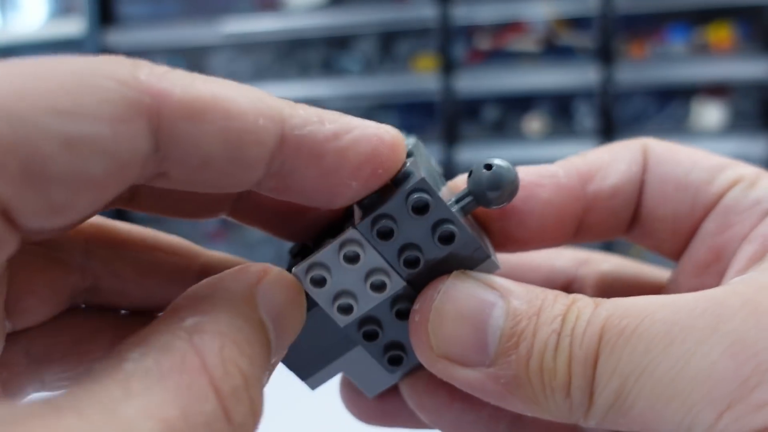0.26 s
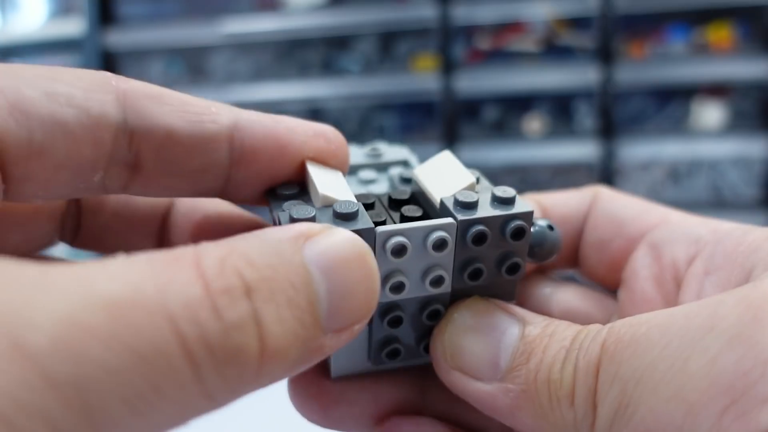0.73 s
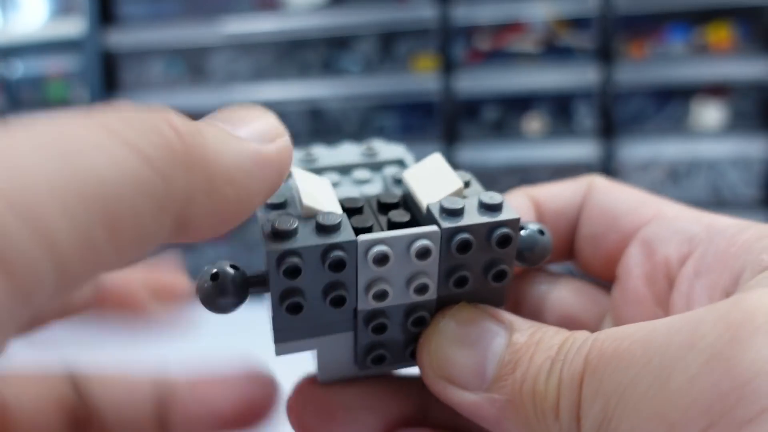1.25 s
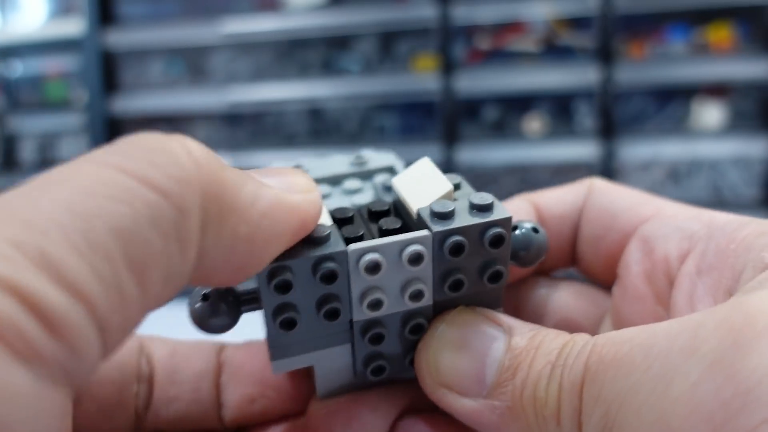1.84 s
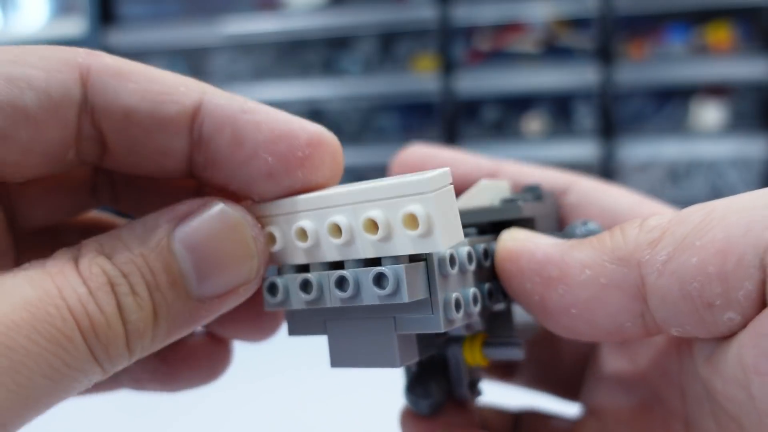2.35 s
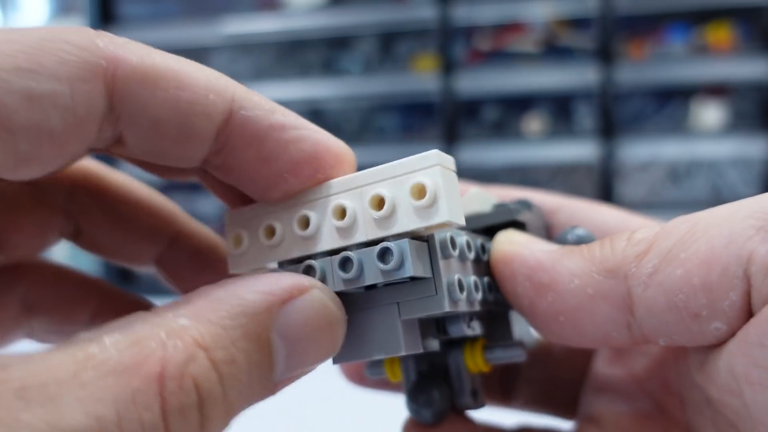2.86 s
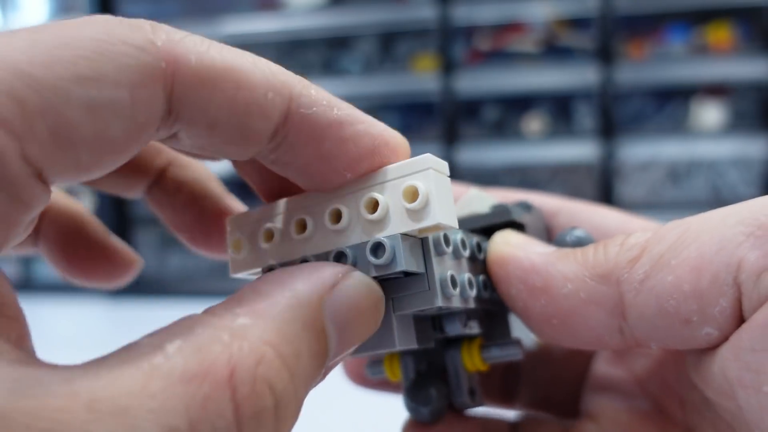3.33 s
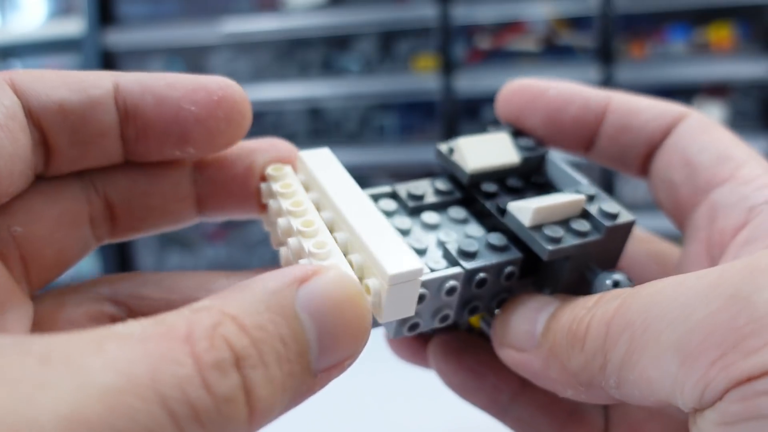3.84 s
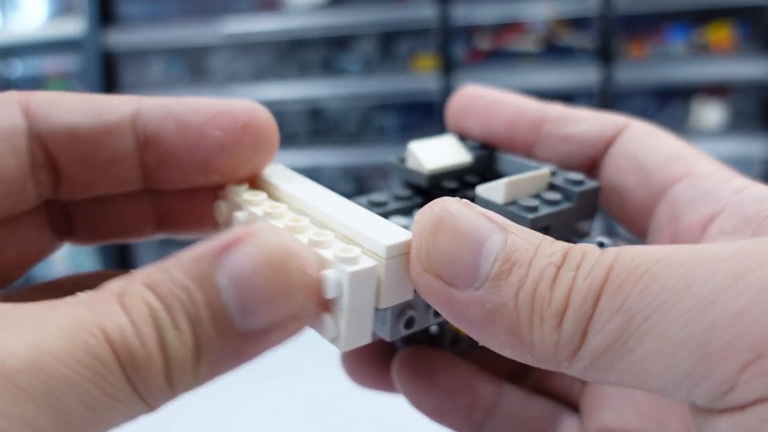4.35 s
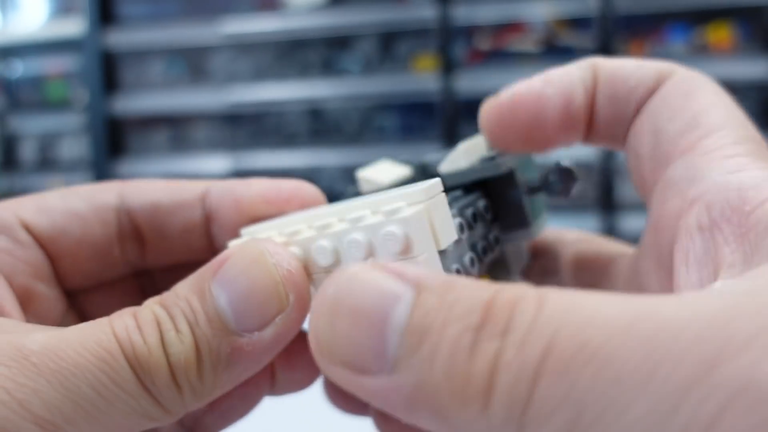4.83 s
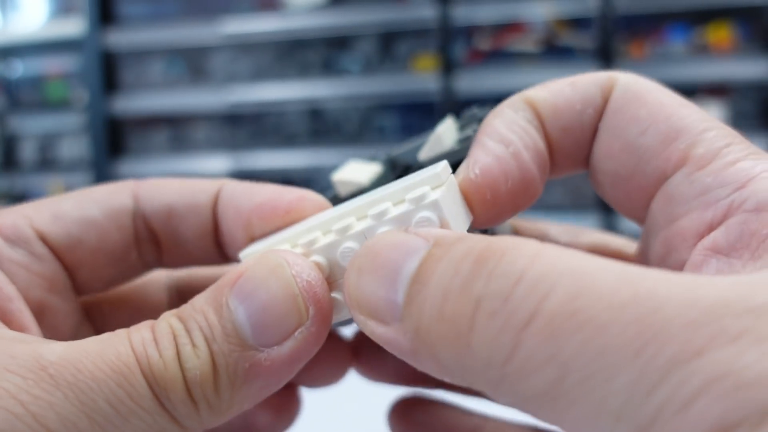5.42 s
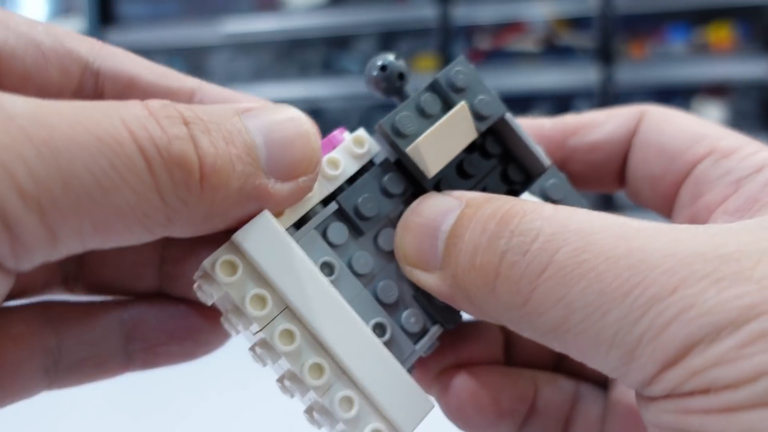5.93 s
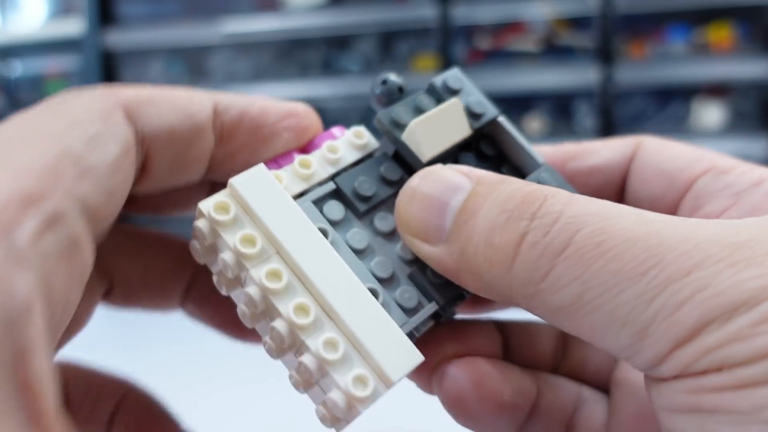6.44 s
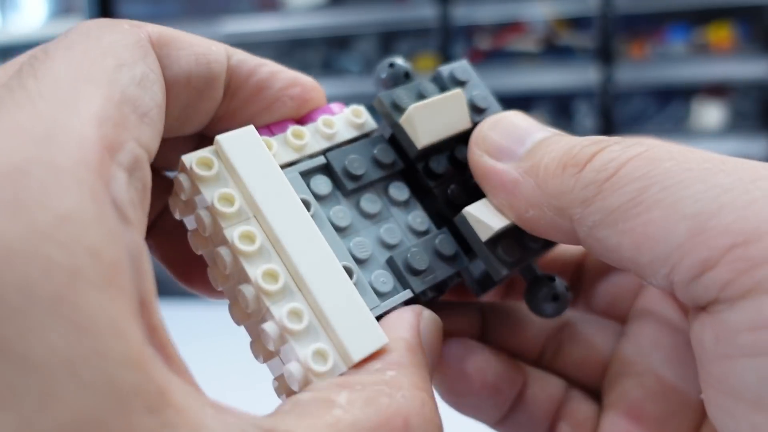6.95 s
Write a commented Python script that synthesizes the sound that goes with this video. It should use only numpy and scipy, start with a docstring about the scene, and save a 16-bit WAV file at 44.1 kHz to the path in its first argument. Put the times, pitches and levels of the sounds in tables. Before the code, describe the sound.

Crisp, dry plastic snaps and tiny creaks as fingers press toy bricks onto a model, with soft sliding rustles and quiet room hush between.

```python
"""Snapping plastic bricks

Two hands press small hollow bricks onto a model, heard close up and in stereo in a small room.
Each snap is a short force that excites the damped modes of the bricks, after a soft gritty onset;
the few onsets of several milliseconds are heard as creaks. Fingers slide as runs of tiny friction grains.
Early reflections and a diffuse tail surround them, above shaped noise for the room hush and a sine hum."""
import sys
import numpy as np
from scipy import signal
from scipy.fft import rfft, irfft
from scipy.io import wavfile

SR = 44100
rng = np.random.default_rng(int(sys.argv[2]) if len(sys.argv) > 2 else 0)


def transcribe(signal):
    """Save signal, clipped to [-1, 1], as a 16-bit WAV file at the path in sys.argv[1]."""
    frames = np.atleast_2d(signal).T
    limited = np.clip(frames, -1, 1)
    pcm = np.round(limited * 32767).astype(np.int16)
    wavfile.write(sys.argv[1], SR, pcm)


N = 316638
CUTOFF_HZ = 16000   # upper edge of the bricks and of the whole sound


def from_db(db):
    """Amplitude ratio of a level: 20 dB is a factor of ten."""
    return 10 ** (np.asarray(db) / 20)


def unit_energy(x):
    """Energy normalisation: the squares sum to one."""
    return x / np.sqrt(np.sum(x ** 2) + 1e-20)


def at_hz(points, hz, axis=1):
    """Interpolate a column of a table linearly along log frequency."""
    points = np.array(points)
    return np.interp(np.log(np.maximum(hz, 1)), np.log(points[:, 0]), points[:, axis])


def add(track, start_s, sound):
    """Superposition: sounds add sample by sample from the start time."""
    i = int(np.clip(round(start_s * SR), 0, N - 1))
    track[i:i + len(sound)] += sound[:N - i]


def stereo(mid, side):
    """Sum and difference: left is mid plus side, right is mid minus side."""
    return np.array([mid + side, mid - side])


def hush():
    """Stationary noise: random spectra shaped by level curves, plus a sine for the low hum of a distant fan."""
    # air noise of the room: (frequency [Hz], relative spectral density [dB])
    hush_spectrum = [(15, -44), (25, -23.5), (80, -18.5), (141, -12.5), (309, -1), (516, -3.5), (591, -2.5),
                     (1260, -4), (1520, -5.5), (2990, -11), (3340, -12), (4370, -14), (6560, -17),
                     (13600, -21), (16000, -22.5)]
    # its width: (frequency [Hz], side level relative to mid [dB])
    hush_width = [(60, -2.5), (130, -10), (290, -11), (640, -4.5), (1410, -2.5), (15000, -1)]
    hush_db = -65   # rms of the mid signal
    hum_hz, hum_db = 96.9, -89   # hum level is rms

    hz = np.fft.rfftfreq(N, 1 / SR)
    mid, side = rfft(rng.standard_normal((2, N))) * from_db(at_hz(hush_spectrum, hz))
    side = irfft(side * from_db(at_hz(hush_width, hz)), N)
    mid = irfft(mid, N)
    hum = np.sqrt(2) * from_db(hum_db) * np.sin(2 * np.pi * hum_hz * np.arange(N) / SR)
    return from_db(hush_db) * stereo(mid, side) / np.std(mid) + hum


def room(x, level_db=-8.0, side_db=-6.5, build_s=0.0073, count=14):
    """Diffuse reverberation: band noise builds up over milliseconds, then decays exponentially at its own rate."""
    # decay of the room: (frequency [Hz], reverberation time T60 [s], relative level of the tail [dB])
    room_decay = [(299.3, 0.4, -3.5), (1000, .3, 0.5), (2200, 0.305, -2), (5530, 0.36, -1.5),
                  (9400, 0.34, -0.5), (15000, 0.17, -5.5)]

    t = np.arange(SR // 2) / SR
    white = rng.standard_normal((2, 2, len(t)))
    tail = 0
    edges = np.geomspace(200, 18000, count + 1)
    for k, band in enumerate(zip(edges, edges[1:])):
        hz = np.sqrt(band[0] * band[1])
        decay = from_db(-60 * t / at_hz(room_decay, hz))
        envelope = unit_energy(decay * (1 - np.exp(-(t / build_s) ** 2)))
        # neighbouring bands draw on different noise
        noise = signal.sosfilt(signal.butter(2, band, "band", fs=SR, output="sos"), white[k % 2])
        tail = tail + noise * envelope * from_db(level_db + at_hz(room_decay, hz, axis=2))
    mid, side = tail
    return signal.fftconvolve(x[None], stereo(mid, from_db(side_db) * side), axes=1)[:, :N]


def scatter(x, first_s=0.0013, t60=0.031, level_db=-4.5, side_db=-8.5, count=90):
    """Early reflections: sparse random echoes off fingers and table, fading exponentially within 30 ms."""
    t = np.arange(int(.03 * SR)) / SR
    paths = rng.standard_normal((2, len(t))) * (rng.random((2, len(t))) < 2 * count / len(t))
    mid, side = paths * (t > first_s) * from_db(-60 * t / t60)
    side = np.gradient(side)   # close receivers differ only at short wavelengths
    echoes = from_db(level_db) * stereo(unit_energy(mid), from_db(side_db) * unit_energy(side))
    return signal.fftconvolve(x[None], echoes, axes=1)[:, :N]


def resonance(hz, centre_hz, width_hz):
    """Damped resonator: the response of one mode, 1 at its peak."""
    return 1 / (1 + 1j * (hz ** 2 - centre_hz ** 2) / (hz * width_hz))


def causal(gain_db):
    """Causality by minimum phase: the folded cepstrum lets no response precede its excitation."""
    cepstrum = irfft(np.log(from_db(gain_db)))
    half = len(cepstrum) // 2
    cepstrum[1:half] *= 2
    cepstrum[half + 1:] = 0
    return np.exp(rfft(cepstrum))


def brick(colour_db, rings, ring_width_hz, grip_spread=0.031, lowest_hz=199.8, size=2048):
    """Modal impulse response of the model: radiation, wall modes shifted by the grip, and rings of touched parts."""
    # radiation of such small parts: (frequency [Hz], gain [dB])
    radiation = [(120, -40), (300, -31.5), (600, -22.5), (1000, -11.5), (2000, -5.5), (4000, 1.5),
                 (6000, 2), (10000, 0.5), (15500, -10)]
    # wall modes of the hollow bricks: (frequency [Hz], width [Hz], gain at the peak [dB])
    walls = [(1301, 133, 2), (2064, 190, 4), (3096, 180, 0.5), (3787, 289, 2.5), (4400, 740, -1),
             (5310, 600, 1.5), (6230, 710, -0.5), (7260, 540, 0.5), (8600, 730, -2), (9000, 420, -0.5),
             (10450, 560, -1), (11100, 700, 1), (13020, 800, 6), (14800, 850, 8)]
    # corners of the colour curve: (frequency [Hz]); the second stays at 0 dB
    colour_hz = [1500, 4500, 9000, 14000]

    hz = np.maximum(np.fft.rfftfreq(size, 1 / SR), 1)
    low, high, top = colour_db
    colour = list(zip(colour_hz, [low, 0, high, top]))
    response = causal(at_hz(radiation, hz) + at_hz(colour, hz))
    for (mode_hz, width_hz, mode_db), grip in zip(walls, rng.standard_normal(len(walls))):
        # each wall holds its band back for a moment and gives it off again
        mode = resonance(hz, mode_hz * (1 + grip_spread * grip), width_hz)
        response *= 1 - (1 + from_db(mode_db)) * mode
    response *= 1 + sum(from_db(ring_db) * resonance(hz, ring_hz, ring_width_hz)
                        for ring_hz, ring_db in rings)
    # parts this small give off no bass, and the contact is too slow for the highest treble
    edges = signal.butter(3, [lowest_hz, CUTOFF_HZ], "band", fs=SR, output="sos")
    return signal.sosfilt(edges, irfft(response)[:size // 2])


def brighten(colour_db, brightness_db):
    """Contact stiffness: a harder contact loses body at 1.5 kHz and gains edge at 9 and 14 kHz."""
    body_per_db, edge_per_db = -0.94, 1.3   # dB for each dB of brightness at 9 kHz
    return np.array(colour_db) + brightness_db * np.array([body_per_db, 1, edge_per_db])


def rubs(grains_per_s=1400., grain_spread_db=1.0, patchy_db=2.5, catches_per_s=25., catch_db=10.,
         ring_width_hz=300.0, trim_db=-3.0):
    """Sliding friction: random grains, a few of them stronger catches on studs, excite the part being rubbed."""
    # strokes of the fingers: (middle [s], half-length [s], level before the trim [dB],
    #   brightness [dB], ring of the rubbed part [Hz])
    strokes = [(0.523, 0.11, -63.5, 0, 5560), (1.173, 0.029, -57, 0.5, 4320), (1.32, 0.026, -63, -2, 6300),
               (1.736, 0.11, -54.5, -5, 1450), (3.182, 0.023, -61.5, 3, 7460),
               (3.303, 0.07, -70.5, 2, 7620), (3.447, 0.068, -58.5, -6, 1830),
               (4.096, 0.035, -57, 2, 11930), (4.164, 0.046, -59.5, 0, 4200), (4.389, 0.049, -58, 0, 4050),
               (4.464, 0.09, -60, -3.5, 4000), (4.549, 0.052, -58, 3, 3620), (4.612, 0.036, -58, 0.5, 3760),
               (4.722, 0.17, -60, 0.5, 3900), (5.217, 0.42, -70, 2, 2670), (5.55, 0.34, -61, -3, 2170),
               (6.133, 0.082, -63.5, 4, 10850), (6.25, 0.097, -60.5, -1.5, 2030),
               (6.512, 0.094, -68.5, 1, 8270), (6.734, 0.097, -59.5, 2.5, 3860)]
    # skin is softer than plastic: colour at 1.5, 9 and 14 kHz, and how strongly it rings the part
    skin_db, skin_ring_db = (9.5, -1.5, -5.5), 4.0

    out = np.zeros(N)
    # slowly varying pressure makes the runs uneven
    pressure = np.interp(np.arange(N), np.linspace(0, N, 500), rng.standard_normal(500))
    spread = np.clip(rng.standard_normal(N), -2, 2)
    sizes = from_db(grain_spread_db * spread + patchy_db * pressure)
    chance = rng.random(N) * SR
    hits = (chance < grains_per_s) + from_db(catch_db) * (chance < catches_per_s)
    grains = hits * rng.choice([-1, 1], N) * sizes
    for s, length, level_db, brightness_db, ring_hz in strokes:
        first, samples = max(int((s - length) * SR), 0), int(2 * length * SR)
        force = grains[first:first + samples]
        force = force * np.hanning(len(force))   # swells and fades
        body = brick(brighten(skin_db, brightness_db), [(ring_hz, skin_ring_db)], ring_width_hz)
        stroke = unit_energy(signal.fftconvolve(force, body))
        add(out, s - length, from_db(level_db + trim_db) * np.sqrt(length * SR) * stroke)
    return out


def grip_at(s):
    """Excitation point: the part gripped at this time sets the colour, ring and room send of a snap."""
    # grips, each bringing another part into play: (start [s], colour at 1.5 kHz [dB], at 9 kHz [dB],
    #   at 14 kHz [dB], ring [Hz], ring level [dB], room send [dB])
    grips = [(0, -7, 1, -1.5, 2650, -2, 5.5), (0.55, 4, -0.5, -10, 5350, 0, 0.5),
             (0.78, -2.5, 6, 6, 4430, 4.5, 1.5), (1.4, -2, 3.5, 0.5, 6550, -5, 2),
             (2.1, 3, -4, -11, 8750, 8, 1.5), (2.45, 7, 0, -12, 6220, 12, 3.5),
             (2.7, 3, -5, -14, 5760, 12, -3), (2.9, -3.5, -2, -16.5, 3030, 5, 1),
             (3.5, 1.5, 2.5, -18, 7000, 9.5, 1), (3.85, 12.5, -3.5, -10, 3820, 13.5, -1.5),
             (4.9, -1.5, 6.5, 6, 4940, -4, 0), (5.8, -4, 3.5, -1, 9500, -4, 1),
             (6.4, -4, 2, -5.5, 2720, 7, 1.5), (7.13, -5, -4, -8.5, 2850, 2, -2.5)]

    current = sum(s >= row[0] for row in grips[1:])
    _, low, high, top, ring_hz, ring_db, room_db = grips[current]
    return (low, high, top), (ring_hz, ring_db), room_db


def gritty_force(length_ms, grit_per_ms=.3, count=12):
    """Impulse train: one unit impulse, then random smaller ones; longer forces are grittier."""
    samples = max(int(length_ms * SR / 1000), 2)
    force = np.zeros(samples + 1)
    places = 1 + (rng.random(count) * samples).astype(int)
    force[places] = rng.standard_normal(count) * min(grit_per_ms * length_ms, 1)
    force[0] = 1
    return force


def snaps(ring_width_hz=490.0, settle_s=0.04, settle_db=-23.0, settle_spread_db=3.5, count=3):
    """Impulsive excitation: a soft onset, a main click and faint ticks ring the bricks; gives near sound and room send."""
    # studs snapping and edges ticking: (time of the main click [s], level before the mix, rms over 5 ms [dB],
    #   brightness [dB], onset length before the click [ms], own ring [Hz], ring level [dB])
    clicks = [(0.328, -27, 0, 1.15, 3770, -2), (0.5765, -51, -4, 0.71, 1610, 14),
              (0.635, -51.5, 1, 0.64, 5360, 17), (0.67, -42, 0, 1.5, 3660, -2),
              (0.7456, -48.5, 2.5, 0.5, 4530, 5), (0.808, -39, 3.5, 0.5, 7400, 1),
              (0.873, -27.5, 0.5, 1.15, 10630, 4), (0.885, -36.5, 7, 0.56, 7780, -1),
              (0.9196, -43.5, -6.5, 0.53, 4400, 8), (0.976, -53, -1, 0.5, 3900, 15),
              (1.1527, -54.5, -12, 0.5, 2490, 5), (1.521, -54, -13, 0.5, 5200, 0),
              (1.5515, -36.5, -4.5, 6.1, 9900, 7), (1.5915, -37, -1.5, 0.53, 9450, 7.5),
              (1.629, -33, 4.5, 3.4, 3700, 2), (1.6602, -30.5, 4, 6, 9000, -5),
              (1.696, -40, 1, 1.6, 9590, 1), (1.8468, -52.5, 2, 0.5, 9400, 6),
              (2.298, -39.5, 0, 0.51, 2930, 9.5), (2.546, -49.5, -2.5, 0.5, 3070, 6),
              (2.57, -31, -4, 7, 3850, 10), (2.5744, -20, 0.5, 0.55, 9180, 9.5),
              (2.768, -25, -0.5, 7.6, 4560, 2.5), (2.988, -21.5, 0, 0.5, 2280, -2.5),
              (3.6705, -38.5, -0.5, 0.5, 6300, 3), (3.9713, -38, -0.5, 0.47, 9750, 4),
              (4.403, -46, 2, 2.5, 4020, 22.5), (4.9824, -51.5, -8.5, 0.42, 8300, 1.5),
              (5.352, -40.5, -0.5, 0.48, 3460, 1), (5.379, -39, 2, 0.5, 11340, 1.5),
              (5.4124, -49, -12, 0.5, 7720, 14), (5.4229, -36.5, -3.5, 3, 5560, 1.5),
              (5.4475, -50, -6, 0.5, 2970, 5), (5.4669, -27, -2.5, 1.8, 4970, 7),
              (5.506, -23.5, -1, 1.23, 9800, 6), (5.5554, -31, 1, 2, 4380, 6),
              (5.594, -37, 2, 0.5, 7840, 9.5), (5.623, -30.5, 6, 1.2, 10600, 5.5),
              (5.671, -38.5, 13, 0.5, 10800, 4), (5.705, -42, 7, 0.5, 10700, 4),
              (5.8538, -39, 0, 0.44, 2780, 10.5), (6.174, -53, -5, 0.5, 3780, 0),
              (6.8902, -33.5, -6, 1.93, 3490, -1), (6.9587, -39.5, 2.5, 0.5, 5600, 1),
              (6.9718, -39, 9, 0.6, 3950, 8), (7.002, -48, -1, 2, 4130, 12),
              (7.042, -49.5, -3, 0.56, 2330, 9), (7.078, -39.5, -0.5, 0.5, 9300, 7),
              (7.0922, -41, 4, 0.44, 3460, -2.5), (7.1081, -34, 3, 2.6, 2420, -2),
              (7.156, -19.5, 0, 1.83, 6300, -3)]
    # the onset gets louder with its length, up to onset_db relative to the main click
    onset_db, onset_full_ms, click_ms = -3.5, 2.4, 0.55

    near, sent = np.zeros(N), np.zeros(N)
    span = .005 * SR   # samples in the 5 ms that levels refer to
    for s, level_db, brightness_db, onset_ms, ring_hz, ring_db in clicks:
        colour_db, part_ring, room_db = grip_at(s)
        rings = [part_ring, (ring_hz, ring_db)]
        body = unit_energy(brick(brighten(colour_db, brightness_db), rings, ring_width_hz))
        strength = from_db(level_db) * np.sqrt(span)
        # onset and main click share the energy of the snap
        onset_ratio = from_db(onset_db) * min(onset_ms / onset_full_ms, 1)
        click = strength / np.hypot(1, onset_ratio)
        # a soft gritty onset just before the main click; one of several ms is heard as a creak
        onset = unit_energy(np.convolve(gritty_force(onset_ms), body))
        add(near, s - onset_ms / 1000, click * onset_ratio * onset)
        add(near, s, click * unit_energy(np.convolve(gritty_force(click_ms), body)))
        # the room hears the brick from all sides, which evens out the grit
        add(sent, s, strength * from_db(room_db) * body)
        # the strained parts settle with a few faint ticks
        for wait, force in zip(rng.random(count), rng.uniform(-0.96, 1, count)):
            tick = strength * from_db(settle_db + settle_spread_db * force) * body
            add(near, s + settle_s * wait, tick)
    return near, sent


def scene(pan_db=0.0, direct_db=-0.6):
    """Superposition of direct sound, early reflections, tail and background; the hands work in the middle."""
    near, sent = snaps()
    fingers = rubs()
    near, sent = near + fingers, sent + fingers
    bricks = from_db(direct_db) * near + scatter(near) + room(sent)
    return bricks * from_db([[pan_db / 2], [-pan_db / 2]]) + hush()


def record(dry):
    """Band limiting: an elliptic low-pass cuts the top of the treble steeply."""
    return signal.sosfilt(signal.ellip(10, .2, 70, CUTOFF_HZ, fs=SR, output="sos"), dry)


dry = scene()
out = record(dry)
transcribe(out)
```